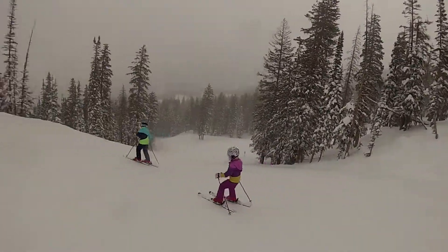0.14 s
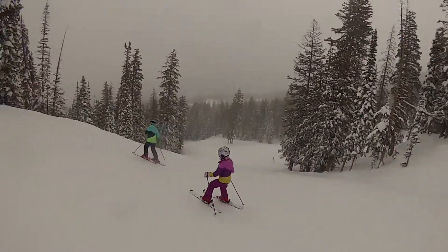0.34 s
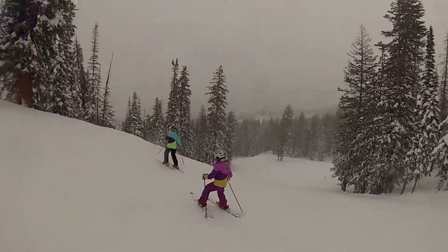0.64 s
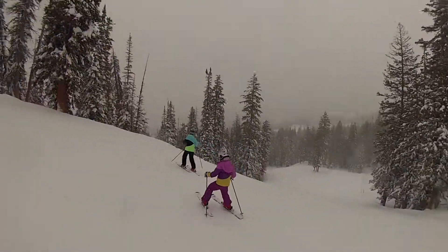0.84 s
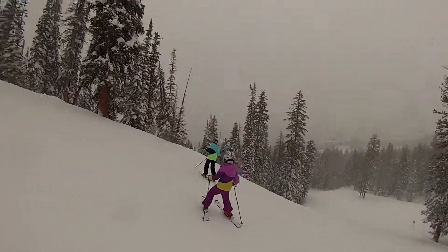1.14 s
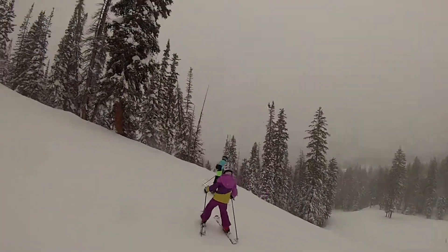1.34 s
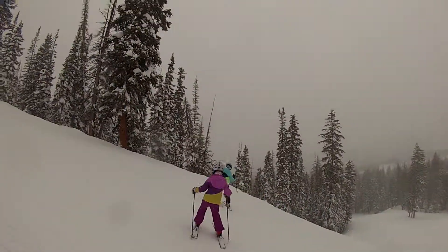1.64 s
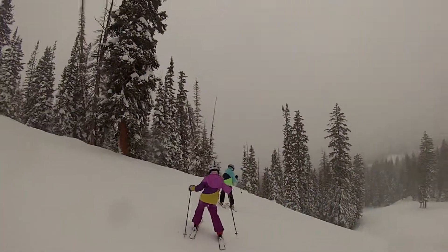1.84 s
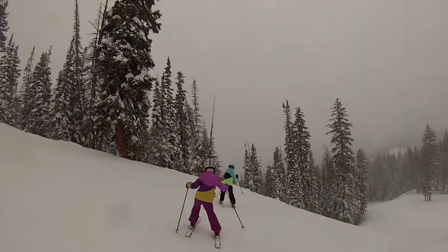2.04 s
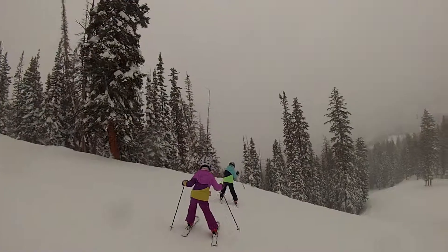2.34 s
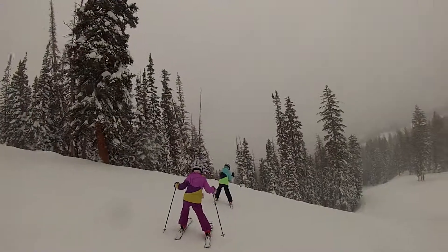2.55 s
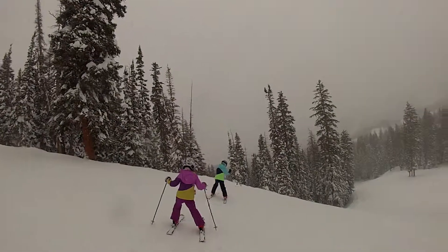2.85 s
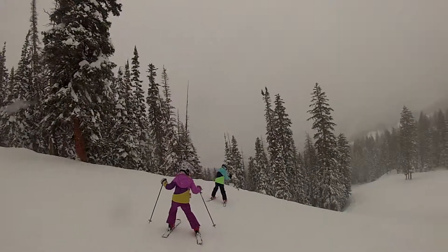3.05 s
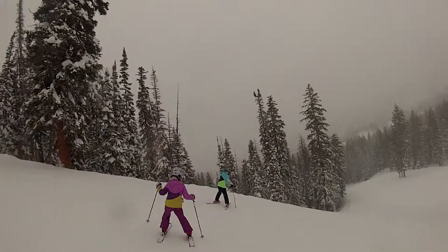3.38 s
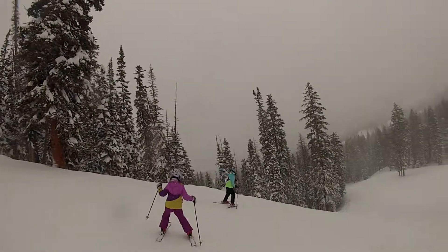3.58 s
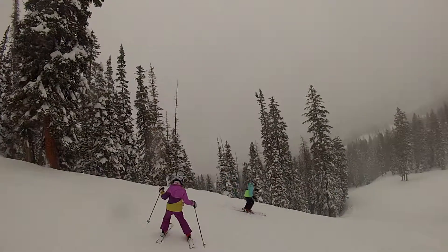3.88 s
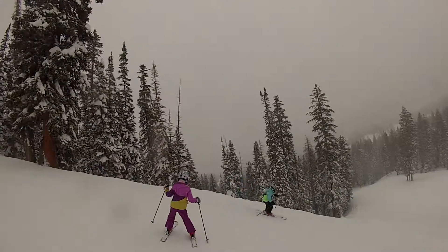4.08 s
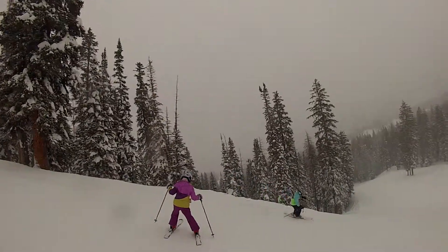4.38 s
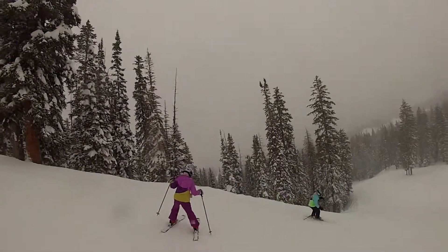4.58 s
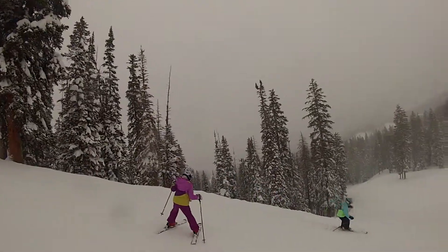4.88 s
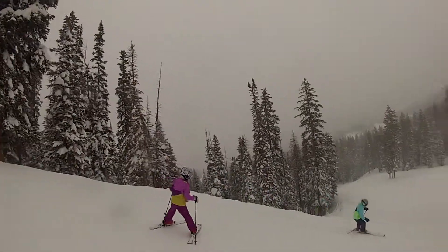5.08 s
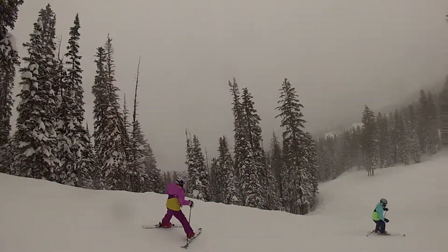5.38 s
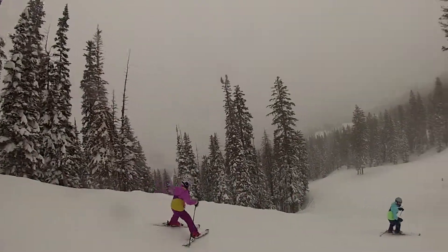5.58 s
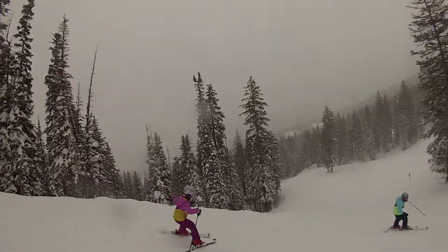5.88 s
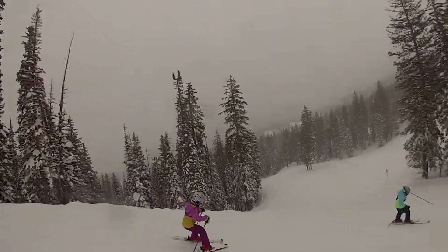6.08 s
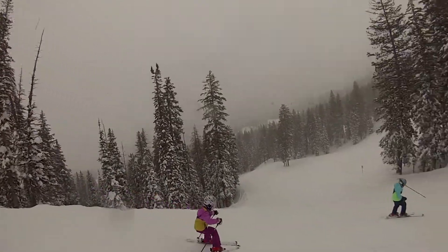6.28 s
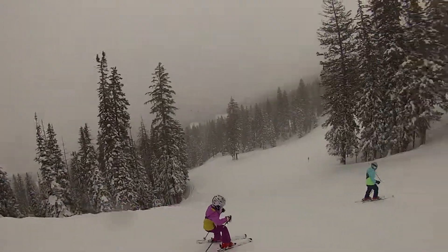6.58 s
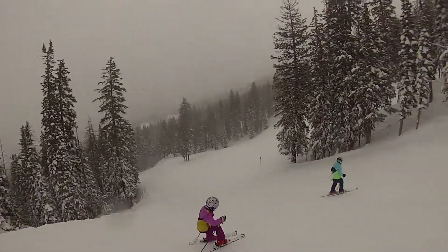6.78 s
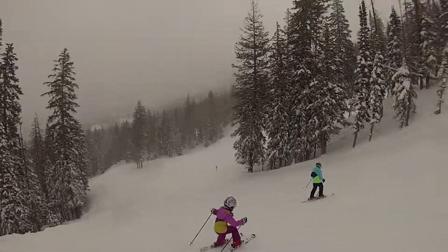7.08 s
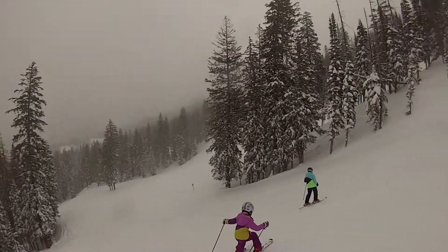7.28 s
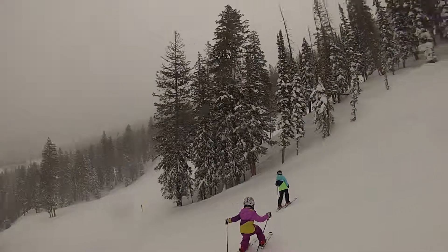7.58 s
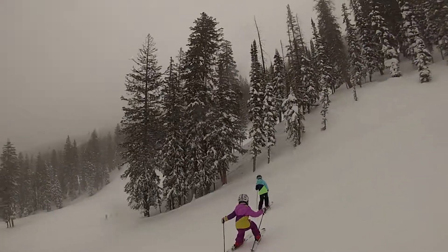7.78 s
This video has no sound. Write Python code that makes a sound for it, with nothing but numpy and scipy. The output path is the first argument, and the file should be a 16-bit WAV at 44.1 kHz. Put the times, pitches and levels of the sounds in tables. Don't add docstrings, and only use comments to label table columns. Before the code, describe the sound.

Skis hiss through powder snow while wind rumbles softly on a helmet camera's sealed case, with snow pellets ticking and clicking on the plastic.

```python
import sys
import numpy as np
from scipy import signal
from scipy.fft import rfft, irfft
from scipy.io import wavfile
from scipy.ndimage import uniform_filter1d

SR = 44100
rng = np.random.default_rng(int(sys.argv[2]) if len(sys.argv) > 2 else 0)


def wav_record(signal):
    frames = np.transpose(np.atleast_2d(signal))
    bounded = np.clip(frames, -1, 1)
    quanta = np.round(bounded * 32767).astype(np.int16)
    wavfile.write(sys.argv[1], SR, quanta)


def gain_from_db(level_db):
    decades = np.asarray(level_db, float) / 20
    return 10 ** decades


N = 349713

# start_s, level_db
WIND = [(0.0, -54.5), (0.62, -47), (0.9, -42), (1.17, -48.5), (1.5, -47), (1.57, -52), (3.9, -56),
        (5.92, -54), (6.2, -50), (6.25, -57), (6.96, -49), (7.05, -54), (7.18, -48.5), (7.37, -53),
        (7.55, -44), (7.75, -41.5), (7.82, -33), (7.93, -43.5)]
# centre_s, level_db
BUFFETS = [(.11, 5), (1.51, 5), (1.65, 6), (2.39, 8.5), (2.85, 7), (3.26, 5.5), (3.5, -9), (3.85, 0),
           (4.15, -1), (4.85, -1), (5.2, 5), (5.85, -9), (6.21, 2.5), (6.35, 2), (6.75, 3), (7.19, 10.5)]
# centre_s, level_db
PUFFS = [(.05, 2), (.5, 7.5), (1.0, 1), (1.7, -3.5), (2.45, -5), (2.85, 3.5), (3.0, -3), (3.5, -2.5),
         (3.95, -7.5), (4.25, -2.5), (4.47, 3.5), (4.75, -5), (4.9, -1), (5.3, 3.5), (5.9, 2), (6.35, 2.5),
         (6.65, -1.5), (6.95, 1), (7.15, 7), (7.55, 2), (7.8, -17)]
# frequency_hz, density_db
THROB = [(8, -8.5), (18, 0.5), (26, 2), (40, -12), (60, -18), (100, -36), (200, -72)]
FLUTTER = [(20, -21.5), (45, -2), (110, -16), (200, -24.5), (400, -28.5), (900, -35.5), (2000, -89)]
BUFFET_S, PUFF_S = 0.028, 0.14
FLUTTER_DB, FLUTTER_FOLLOWS = -59, 0.24

# start_s, effort_db, fineness_db
EDGING = [(0, -71.5, 1.5), (.52, -70, 0), (.61, -63, -3), (1.0, -65, -1), (1.7, -65.5, -0.5),
          (2.16, -67, -1), (2.6, -73.5, 1), (3.05, -69.5, 0), (3.9, -73, 2), (5.3, -70, -0.5),
          (6.3, -69, 1.5), (6.55, -68.5, 1), (6.7, -67.5, 0.5), (7.1, -67.5, 0), (7.3, -63.5, -2.5),
          (7.45, -60, -2.5), (7.77, -58, -2.5), (7.93, -58.5, -5)]
# level_db at full edging, slope_db per dB of effort, slope_db per dB of fineness
SHAKE_LAW = (-59.5, 1.026, -0.4)
MIDDLE_LAW = (-60, 1.08, -0.074)
HIGH_LAW = (-59, 1.38, 1)
RUSH_LAW = (-68, 1.5, 0.093)
GRIT_LAW = (-69, 2.1, .5)
# centre_s, level_db
JOLTS = [(.62, -55.5), (1.28, -76), (2.58, -66), (2.85, -63), (4.99, -73), (5.12, -71), (5.76, -66),
         (5.94, -67), (6.1, -69), (6.63, -72), (6.73, -74), (6.85, -69), (6.931, -56), (7.02, -68),
         (.84, -65), (.93, -72), (.98, -69), (7.75, -60)]
FULL_EDGE_DB, JOLT_S = -60, 0.02

# pitch_hz, width_hz, level_db
CASE = [(1274, 270, -8.5), (1470, 135, 0), (1624, 140, -0.5), (1940, 174, -2.5), (2198, 91, -6.5),
        (2550, 420, -5), (2950, 1150, -8.5), (3645, 60, -4), (4570, 1500, -11.5), (5210, 1100, -14.5),
        (6620, 540, -12), (8380, 3100, -16), (10930, 1100, -16), (13000, 3000, -22.5)]
COVER = [(2110, 280, 8.5), (2600, 250, 6.5), (3650, 1400, 0.5), (4700, 1800, -2.5), (6840, 1540, -2.5),
         (8660, 800, -9), (11100, 1900, -9.5), (13460, 9000, -26)]
FRAME = [(1964, 240, 4.5), (2600, 1500, -16), (4500, 750, 7.5), (6650, 630, -3), (9000, 1400, -20)]

# start_s, peak_db, brightness_db per band, hollowness_db
TAPS = [(0.2588, -51, 1, 7), (0.578, -44, 1.5, 16), (0.935, -48, -9, -0.5), (1.623, -42, -6, -0.5),
        (1.6729, -42.5, -1, 1), (1.726, -42.5, 0, 0.5), (1.7555, -42, 0, -1), (2.089, -45.5, -2, 1),
        (2.1925, -44, -1, 0), (2.549, -53, 3, 1), (3.056, -48, 1, 10), (3.569, -42.5, -1, 1.5),
        (3.6682, -41, 0, 1.5), (3.7725, -40, -1.5, 1), (4.669, -49.5, 1, 6), (4.735, -44.5, -4, -1),
        (5.369, -49, -2, 4), (5.3795, -49, 0, 0), (5.384, -49, -3, 4), (5.39, -50, -4, 1),
        (5.3994, -45.5, -7, 4), (5.416, -46.5, -3, 0.5), (5.943, -58, 0, -2), (6.105, -44, 1.5, 6),
        (6.571, -48.5, 1, 0), (6.7062, -48, 4, 8), (6.8288, -48, 4, -1), (6.9567, -48.5, -7, 10),
        (7.015, -53, -3, 3), (7.1152, -50, 2, 3), (7.2665, -44, 1.5, 13), (7.326, -45, 1, 16),
        (7.519, -54, 2, -3), (7.58, -50, 3, -4), (7.63, -51, 0, -2), (7.746, -41, -2, 9),
        (7.895, -53, 2, -8), (7.92, -53, 2, 0)]
# start_s, peak_db, brightness_db per band, hollowness_db
TICKS = [(0.183, -45, 12, -5), (0.413, -52, 5, -3), (0.4255, -48, -8, -5), (1.1414, -45, 5, 0),
         (1.331, -42.5, 0.5, 2), (1.799, -41, 4, 5), (2.453, -39.5, 2.5, 13), (2.7528, -47.5, 0, 2.5),
         (2.8665, -45.5, 0, 4.5), (3.1332, -45, 3, 3), (3.219, -47.5, 7, 5), (3.347, -42.5, 2, 4),
         (3.939, -48.5, 7, 0), (4.1952, -42, 0, 6), (4.5075, -44.5, -1.5, 4), (4.5426, -41, 4, 14),
         (5.4414, -30.5, 3, 3), (5.692, -43, -0.5, 4), (5.8182, -40.5, 2, 14), (6.0276, -37, 3.5, 1),
         (6.0613, -36, 1, 1.5), (6.1539, -36.5, -1.5, 12), (6.332, -45, 0.5, 6), (6.5165, -44, -1, 2),
         (6.628, -46, 3, 3.5), (6.6424, -45.5, -0.5, 10), (7.0413, -41, 7, 2), (7.234, -40.5, 2, 5),
         (7.714, -39, -6.5, -1.5), (7.79, -39, -11, -12)]
# start_s, peak_db, brightness_db per band, hollowness_db
HITS = [(0.2187, -43.5, 6, -1), (0.3164, -43.5, 2.5, 7), (0.4818, -46, 2.5, 5), (1.1634, -40, 6, 6),
        (1.4104, -36.5, 4, 1), (1.742, -39.5, 9, -3), (2.2156, -44, 11, -1), (2.4958, -45, 3.5, 5),
        (2.5839, -41.5, 1.5, 2.5), (2.887, -45, 0.5, 4), (2.9128, -48, 1, 3), (3.1495, -41.5, 1, -4),
        (3.6378, -51, 3, 4), (4.276, -43, 2, 3), (4.5987, -49, 6, 0), (4.7554, -42.5, 2.5, 7.5),
        (4.9795, -41.5, 2, 3), (5.122, -39, 10, -1), (5.136, -31, -0.5, 9), (5.199, -35.5, 1.5, 6),
        (5.351, -35, 6, 1.5), (5.484, -39.5, 3, 3), (5.6756, -42, 4, 6), (5.7268, -37.5, 3.5, 4.5),
        (5.755, -41, 2, 5), (5.883, -42, 4, 8), (5.94, -46, 2, 11), (6.282, -42, 3.5, 9),
        (7.0928, -41.5, 2, 5), (7.37, -39, 3.5, 2.5)]
# start_s, peak_db, brightness_db per band
SPECKS = [(0.3385, -49, 8), (1.172, -46, 1), (1.18, -43, 0), (1.269, -48, 0), (1.416, -50, 7),
          (2.3214, -45.5, 2), (3.5124, -58, -2), (3.7944, -57, 2), (3.874, -53, 10), (4.0073, -50.5, -1),
          (4.2991, -53, -3), (5.038, -50, 0), (5.283, -55, 0), (5.296, -51, 9), (5.3217, -48, 4),
          (5.332, -54, 3), (5.428, -47, 0), (5.46, -61, 3), (5.4906, -45, 7), (5.7704, -48, 2),
          (5.78, -48, 1), (5.809, -47, 4), (5.834, -49, 1), (5.888, -43, 1), (5.914, -47, 5),
          (6.02, -46, 3), (6.098, -46, 8), (6.127, -48, 0), (6.1835, -56, -5), (6.262, -59, 6),
          (6.30, -50, 0), (6.343, -47.5, -0.5), (6.467, -50, -1), (6.66, -42.5, 0.5), (6.7865, -47, 0),
          (7.073, -47, 2), (7.201, -48, 2), (7.388, -46, 1), (7.5114, -45, 8), (7.6264, -51, 0),
          (7.674, -45, 2), (7.691, -47, -3), (7.729, -43, -3), (7.745, -45, -3), (7.765, -44, -8),
          (7.8, -43.5, -3), (7.8623, -42, -1), (7.8714, -53, 0), (7.9204, -50, 0), (2.768, -46, 5),
          (5.197, -49, -3)]
# low_hz, high_hz
PELLET_BANDS_HZ = [(1350, 3000), (3000, 5700), (5700, 9000), (9000, 16400)]
TAP_DB = (-3.5, -0.5, -7.5, -11.5)
TICK_DB = (-6.5, -9.5, -0.5, -6.5)
HIT_DB = (0.5, 2, -2, -5)
SPECK_DB = (-1, -11.5, -6, -0.5)
PELLET_TOP_HZ = 12900

# start_s, peak_db, pitch_hz
ACCENTS = [(1.4108, -44, 4220), (2.5842, -46, 2600), (3.1495, -60, 2640), (3.3466, -48, 6650),
           (3.5683, -47, 1510), (3.638, -52, 11000), (3.7944, -59, 11000), (4.5426, -53, 4870),
           (5.1214, -40, 6800), (5.1218, -52, 2090), (5.1359, -33, 2490), (5.1359, -33, 6900),
           (5.1359, -34, 5500), (5.1359, -33, 4100), (5.1359, -43, 10300), (5.1989, -35.5, 2200),
           (5.1996, -36.5, 4770), (5.1989, -44, 4060), (5.1989, -46, 10600), (5.351, -40.5, 10300),
           (5.3516, -43, 4850), (5.351, -39.5, 8030), (5.4414, -49, 6700), (5.4829, -43, 2110),
           (5.8178, -44, 9400), (6.1534, -45, 11520), (6.8284, -48, 2100), (7.3257, -39, 2540),
           (5.351, -39.5, 2030), (5.4414, -38, 5520), (5.4414, -40, 3540), (5.4414, -45, 12300),
           (5.4829, -44, 5760), (5.7268, -47, 5300), (5.7268, -52, 2600), (5.8178, -45.5, 6700),
           (5.883, -39, 2670), (5.883, -41, 5000), (5.883, -47, 12300), (6.0276, -44, 8400),
           (6.0276, -46, 4700), (6.0614, -33, 6680), (6.0614, -43, 4960), (6.0614, -43.5, 8140),
           (6.1534, -46, 2070), (6.1534, -51, 4270), (6.1534, -40.5, 1630), (6.6425, -42, 2600),
           (6.6425, -54, 4270), (4.639, -50, 2050), (4.638, -52, 3800), (7.0928, -49, 12340),
           (7.37, -48, 6750)]
# start_s, peak_db, pitch_hz
RATTLES = [(0.614, -49, 1520), (0.832, -49, 1440), (0.9438, -57, 1530), (0.9857, -49, 1470),
           (1.1119, -57, 1510), (1.2665, -55, 1660), (1.287, -49, 1470), (1.4257, -51, 1500),
           (1.4394, -58, 1410), (1.5444, -59, 1400), (5.768, -48.5, 1470), (5.931, -46.5, 1486),
           (6.0906, -54, 1380), (6.2682, -56, 1490), (6.332, -57, 1460), (6.4333, -54, 1470),
           (6.6238, -49.5, 1460), (6.734, -48, 1436), (6.7605, -51, 1470), (6.8174, -54, 1470),
           (6.832, -50, 1520), (6.8494, -56, 1450), (6.899, -51, 1240), (6.928, -46, 1630),
           (6.932, -49, 1230), (4.755, -51, 1420), (6.102, -49, 1420), (7.163, -52, 1500),
           (7.241, -52, 1620), (7.3088, -49, 1560), (7.4545, -54, 1560), (7.5183, -51, 1340),
           (7.5494, -46, 1440), (7.6615, -53, 1510), (7.7646, -39, 1530), (7.8, -44, 1380),
           (7.861, -43, 1470), (7.885, -62, 1580)]
# start_s, peak_db, pitch_hz, t60_s
CREAKS = [(1.09, -60, 3650, .035), (5.121, -53.5, 1570, .055), (6.034, -53, 2600, .04),
          (6.705, -58, 3650, .03), (6.771, -57, 3650, .035), (6.93, -58, 3650, .04),
          (6.958, -57, 3650, .05), (7.014, -47.5, 1450, .035), (7.265, -60, 3650, .03),
          (5.977, -57, 1950, .06), (6.96, -60, 660, .04)]
ACCENT_T60_S, ACCENT_RISE_S = 0.0071, 0.00031
RATTLE_T60_S, RATTLE_DB, RATTLE_RISE_S = 0.042, -1.5, 0.0012

# start_s, peak_db, upper_db per octave of mode pitch above 203 Hz
KNOCKS = [(0.002, -52, -11.5), (0.37, -58.5, -9), (0.41, -46, -8), (0.4299, -47.5, -5), (0.445, -51.5, -1),
          (0.5207, -44.5, -10), (0.608, -43, -4), (0.714, -49, -20), (0.73, -49.5, -3), (0.744, -51, -13),
          (0.828, -44, -8), (0.884, -62, 4), (0.894, -49, -4), (1.664, -47, -13), (1.983, -50.5, -21),
          (2.796, -42.5, -13), (4.47, -61, -6), (7.145, -42, -3), (7.382, -56.5, -5.5), (7.469, -56.5, -4)]
# pitch_hz, level_db, t60_s
MOUNT = [(118, 7.5, 0.013), (193, 1, 0.049), (293.5, 1, 0.067), (427, -12, 0.11), (520, -22.5, 0.087),
         (660, -11, 0.029), (804, -12, 0.032)]

FLAKE_RING_HZ, FLAKE_RING_WIDTH_HZ, FLAKE_RING_DB, FLAKE_RING_SWING_DB = 11020, 180, -91, 6.5

# frequency_hz, density_db
CAPSULE = [(200, -7.5), (1000, 3.5), (3200, 0), (7600, -5), (11000, -6.5), (15500, -7)]
HISS = [(60, -34), (200, -2.5), (1000, 2), (3200, 0), (7600, 2), (11000, -1.5), (15200, -6)]
SHARED_HISS_DB, HISS_DB = -69.5, -72.5
# frequency_hz, level_db
KEPT = [(12300, -125), (12850, -102.5), (15200, -103.5), (15300, 0)]
SHARP_DB = 9.0


def evened(x):
    return x / np.sqrt(np.mean(x ** 2) + 1e-20)


def read(points, hz):
    f, value = np.transpose(points)
    return np.interp(np.log(hz + 1), np.log(f + 1), value)


def curve(rows, column):
    rows = np.array(rows)
    return np.interp(np.arange(N) / SR, rows[:, 0], rows[:, column])


def bumps(rows, width_s):
    t = np.arange(0, N, 64) / SR
    swells = sum(high * np.exp(-((t - s) / width_s) ** 2) for s, high in rows)
    return np.interp(np.arange(N) / SR, t, swells)


def drift(span):
    white = rng.standard_normal(N)
    return evened(uniform_filter1d(uniform_filter1d(white, int(span)), int(span)))


def noise(points, channels=1):
    white = rng.standard_normal((channels, N))
    gain = gain_from_db(read(points, np.fft.rfftfreq(N, 1 / SR)))
    return evened(irfft(rfft(white) * gain, N))


def steadied(x, span_s, share):
    span = int(span_s * SR)
    power = uniform_filter1d(uniform_filter1d(x ** 2, span), span)
    return evened(x / (abs(power) + 1e-3) ** (share / 2))


def band(x, lo_hz, hi_hz):
    return signal.sosfilt(signal.butter(2, [lo_hz, hi_hz], "band", fs=SR, output="sos"), x)


def ring_of(modes, leak_db):
    hz = abs(np.fft.fftfreq(8192, 1 / SR))
    power = gain_from_db(2 * leak_db) + sum(gain_from_db(2 * db) / (1 + (2 * (hz - f) / w) ** 2) ** 2 for f, w, db in modes)
    log_gain = np.log(power) / 2
    minimum_phase = np.exp(np.conj(signal.hilbert(log_gain)))
    ring = np.fft.ifft(minimum_phase).real[:2048]
    return ring / np.linalg.norm(ring)


def wind():
    pressure_db = curve(WIND, column=1)
    throb = steadied(noise(THROB)[0], span_s=0.036, share=0.79)
    throb = throb * gain_from_db(pressure_db + bumps(BUFFETS, BUFFET_S))
    flutter = noise(FLUTTER)[0]
    lump_db = 2.6 * drift(span=1300) + bumps(PUFFS, PUFF_S) - 1.5
    lumps = band(flutter, 29, 150) * (gain_from_db(lump_db) - 1)
    flutter_db = FLUTTER_DB + FLUTTER_FOLLOWS * (pressure_db - pressure_db.mean())
    return throb + (flutter + lumps) * gain_from_db(flutter_db)


def spray(ring):
    flicker = drift(span=370)
    effort_db = curve(EDGING, column=1) - FULL_EDGE_DB
    fine_db = curve(EDGING, column=2)
    laws = (SHAKE_LAW, MIDDLE_LAW, HIGH_LAW, RUSH_LAW, GRIT_LAW)
    shake, middle, high, rush, grit = (gain_from_db(db + by_effort * effort_db + by_fine * fine_db)
                                       for db, by_effort, by_fine in laws)
    jolts = bumps([(s, gain_from_db(db)) for s, db in JOLTS], JOLT_S)

    chance, size, white = rng.random(N), rng.exponential(1, N), rng.standard_normal(N)
    landing = chance < 300 / SR * gain_from_db(3.5 * flicker)
    crystals = landing * gain_from_db(4.5 * np.minimum(size, 3.4)) * np.sign(white)
    drive = white * gain_from_db(0.91 * flicker) + 0.35 * evened(crystals)
    clods = signal.lfilter([1], [1, -0.985], (size > 1.6) * abs(crystals)) * white
    sound = signal.oaconvolve(drive + 0.21 * evened(clods), ring)[:N]

    out = shake * evened(band(sound, 790, 1536) * gain_from_db(0.58 * drift(span=490)))
    out += middle * evened(band(sound, 2036, 2650))
    out += high * evened(band(sound, 2960, 9300) + gain_from_db(0.5) * band(sound, 11050, 14500))
    out += jolts * evened(band(sound, 1060, 2130))
    out += rush * evened(band(drive, 150, 774))
    fine_grit = band(drive + 0.58 * evened(crystals), 4110, 5160)
    return out + grit * evened(fine_grit + gain_from_db(-10) * band(drive, 8300, 8380))


def pellets(ring, rows, colour_db, join=-1):
    size = 700
    t = np.arange(size) / SR
    out = np.zeros(N + size)
    crumble = gain_from_db(-18 - 60 * t / 0.004) + gain_from_db(-28 - 60 * t / 0.035)
    bursts = rng.standard_normal((len(rows), size)) * crumble
    bursts[:, 4] += 1
    rung = signal.fftconvolve(bursts, ring[None, :size], axes=1)[:, :size] * np.hanning(2 * size)[size:]
    parts = np.array([band(rung, *edges) for edges in PELLET_BANDS_HZ])
    parts /= np.linalg.norm(parts, axis=2, keepdims=True) * np.array([1, join, 1, 1])[:, None, None]
    parts = signal.sosfilt(signal.butter(2, PELLET_TOP_HZ, fs=SR, output="sos"), parts)
    place = np.arange(4) - 1.5
    for k, (s, db, bright_db, hollow_db) in enumerate(rows):
        band_db = np.array(colour_db) + bright_db * place + hollow_db * (place ** 2 - 1.25)
        tick = gain_from_db(band_db) @ parts[:, k]
        at = round(s * SR)
        out[at:at + size] += gain_from_db(db) * tick / abs(tick).max()
    return out[:N]


def single_modes(rows, rise_s):
    t = np.arange(3000) / SR
    out = np.zeros(N + 3000)
    rise = 1 - np.exp(-t / rise_s)
    for s, db, hz, t60 in rows:
        at = round(s * SR)
        out[at:at + 3000] += gain_from_db(db - 60 * t / t60) * rise * np.sin(2 * np.pi * hz * t)
    return out[:N]


def knocks():
    t = np.arange(6000) / SR
    out = np.zeros(N + 6000)
    rise = 1 - np.exp(-(t / 0.0042) ** 2)
    for s, db, upper_db in KNOCKS:
        modes = sum(gain_from_db(d + upper_db * np.log2(f / 203) - 60 * t / t60) * np.sin(2 * np.pi * f * (t - 0.004))
                    for f, d, t60 in MOUNT) * rise
        at = round(s * SR)
        out[at:at + 6000] -= gain_from_db(db + 5.5) * modes / abs(modes).max()
    return out[:N]


def flakes(ring):
    chance, size, pick = rng.random(N), rng.exponential(1, N), rng.random(N)
    taps = (chance < 70 / SR) * gain_from_db(5.8 * np.minimum(size, 1.8))
    thin = band(signal.oaconvolve(taps * (pick < 0.7), ring)[:N], 12200, 16500)
    full = band(signal.oaconvolve(taps * (pick >= 0.7), ring)[:N], 5500, 20000)
    return gain_from_db(-44.5) * thin + gain_from_db(-64) * full


def flake_ring():
    half_hz = FLAKE_RING_WIDTH_HZ / 2
    air = band(rng.standard_normal(N), FLAKE_RING_HZ - half_hz, FLAKE_RING_HZ + half_hz)
    return evened(air) * gain_from_db(FLAKE_RING_DB + FLAKE_RING_SWING_DB * drift(span=1500))


def scene():
    case, cover, frame = ring_of(CASE, leak_db=-34), ring_of(COVER, leak_db=-17.5), ring_of(FRAME, leak_db=-6)
    mono = wind() + spray(case)
    mono += pellets(frame, TAPS, TAP_DB, join=0.87)
    mono += pellets(cover, TICKS, TICK_DB, join=1)
    mono += pellets(cover, HITS, HIT_DB)
    mono += pellets(cover, [(*row, 0) for row in SPECKS], SPECK_DB)
    mono += single_modes([(*row, ACCENT_T60_S) for row in ACCENTS], ACCENT_RISE_S)
    rattles = [(s, db + RATTLE_DB, hz, RATTLE_T60_S) for s, db, hz in RATTLES]
    mono += single_modes(rattles, RATTLE_RISE_S)
    mono += single_modes(CREAKS, rise_s=0.00012)
    mono += knocks() + flakes(cover) + flake_ring()
    return np.array([mono, mono])


def sharp_treble(x):
    top = signal.sosfiltfilt(signal.butter(8, [12000, 16200], "band", fs=SR, output="sos"), x)
    level_db = 10 * np.log10(abs(uniform_filter1d(top ** 2, 96)) + 1e-14)
    sudden = level_db - uniform_filter1d(level_db, 8000) > SHARP_DB
    gate = uniform_filter1d(uniform_filter1d(1.0 * sudden, 96), 64)
    return top * np.minimum(2 * gate, 1)


def camera_thinning(mid, side, masked_db):
    sharp = sharp_treble(mid)
    hz, _, z = signal.stft([mid, side, sharp], SR, nperseg=1024)
    z = np.array([z[0], z[1], z[0] - z[2]])
    power = (abs(z[:, :512].reshape(3, 128, 4, -1)) ** 2).mean(axis=2, keepdims=True)
    mid_db, side_db, calm_db = 10 * np.log10(uniform_filter1d(power, 3) + 1e-20)

    treble_db = mid_db[28:68].mean(axis=0)
    busy_db = uniform_filter1d(np.maximum(treble_db - uniform_filter1d(treble_db, 41) - 3, 0), 3)
    whim_db = 6.5 * uniform_filter1d(rng.standard_normal((2, *mid_db.shape)), 4)
    centre_hz = hz[2:512:4, None, None]
    below_top = centre_hz < 15250
    least_db = read(KEPT, centre_hz) + busy_db * 2
    keep_mid = calm_db > least_db + whim_db[0] * below_top
    side_least_db = np.maximum(least_db - 8.5, mid_db - masked_db + busy_db) + whim_db[1]
    keep_side = below_top & (side_db > side_least_db)
    keep_side[:4] = True

    kept = np.repeat(np.array([keep_mid, keep_side]), 4, axis=2).reshape(2, 512, -1)
    thinned = np.pad(z[[2, 1], :512] * kept, ((0, 0), (0, 1), (0, 0)))
    thin_mid, thin_side = signal.istft(thinned, SR, nperseg=1024)[1][:, :N]
    return thin_mid + sharp, thin_side


def top_cut(x):
    return signal.sosfilt(signal.butter(12, 16500, fs=SR, output="sos"), x)


def record(dry):
    capsule_hiss = gain_from_db(SHARED_HISS_DB) * noise(CAPSULE)
    left, right = dry + capsule_hiss + gain_from_db(HISS_DB) * noise(HISS, channels=2)
    mid, side = camera_thinning((left + right) / 2, (left - right) / 2, masked_db=16.5)
    return top_cut(np.array([mid + side, mid - side]))


dry = scene()
out = record(dry)
wav_record(out)
```